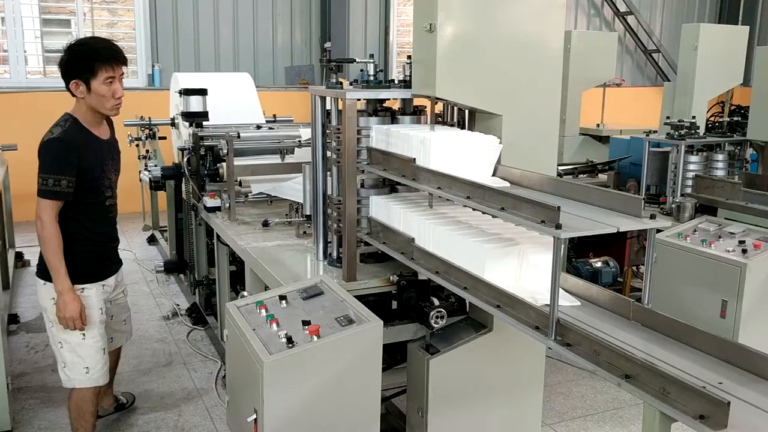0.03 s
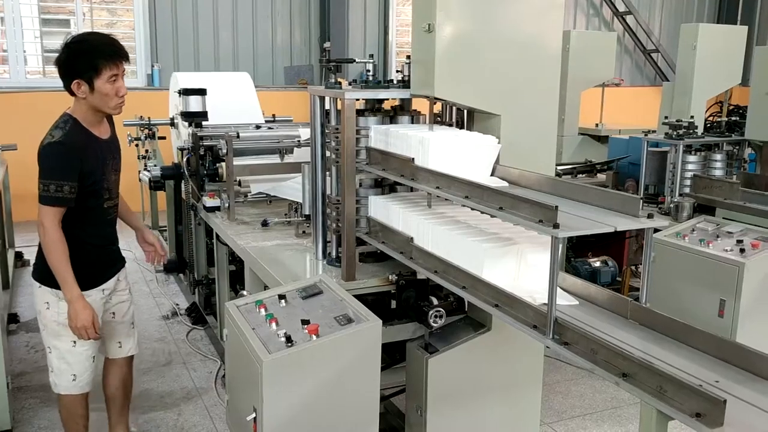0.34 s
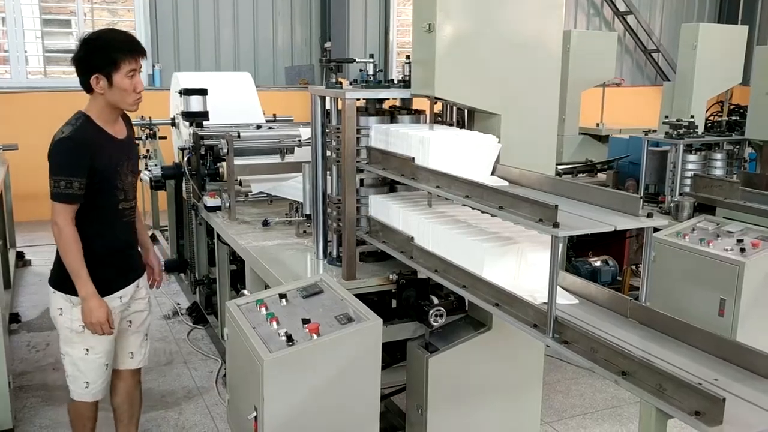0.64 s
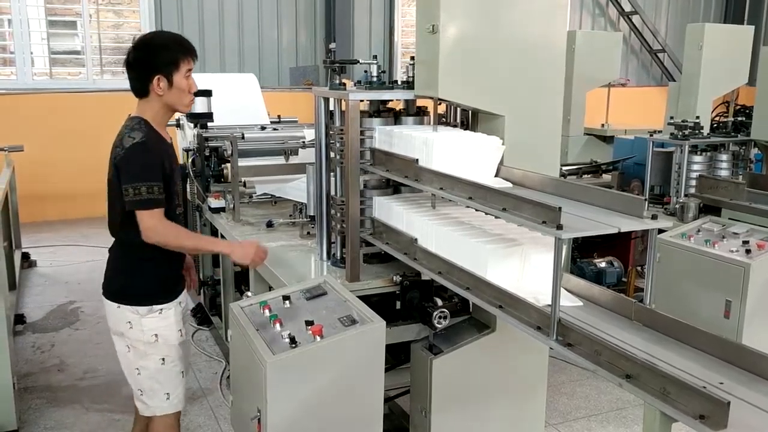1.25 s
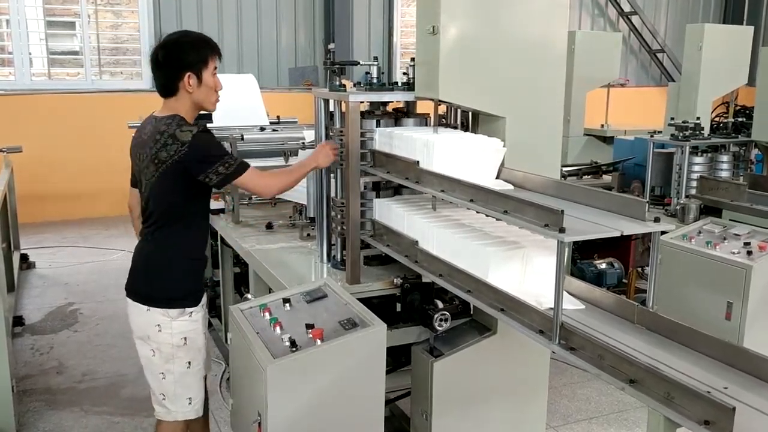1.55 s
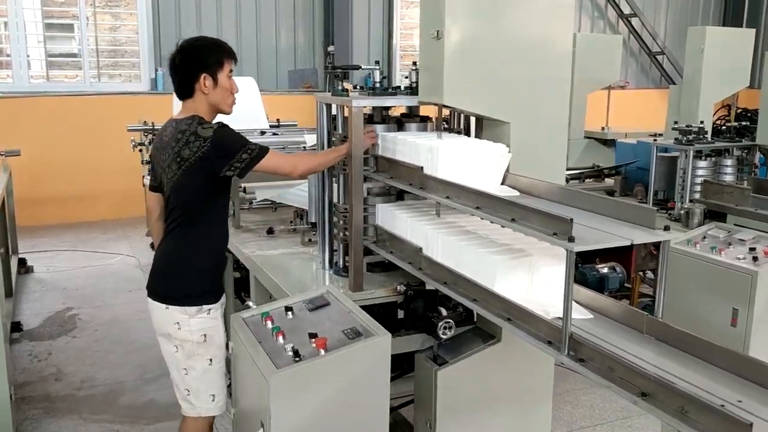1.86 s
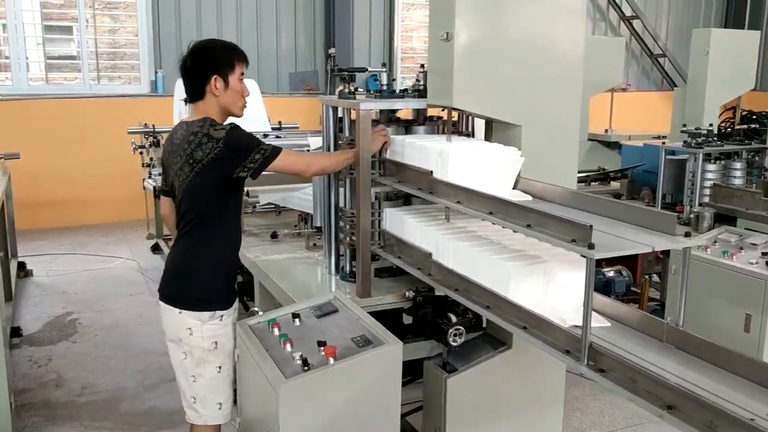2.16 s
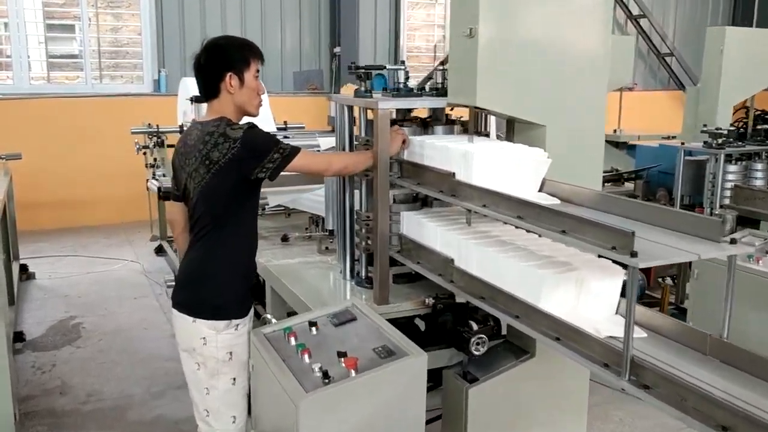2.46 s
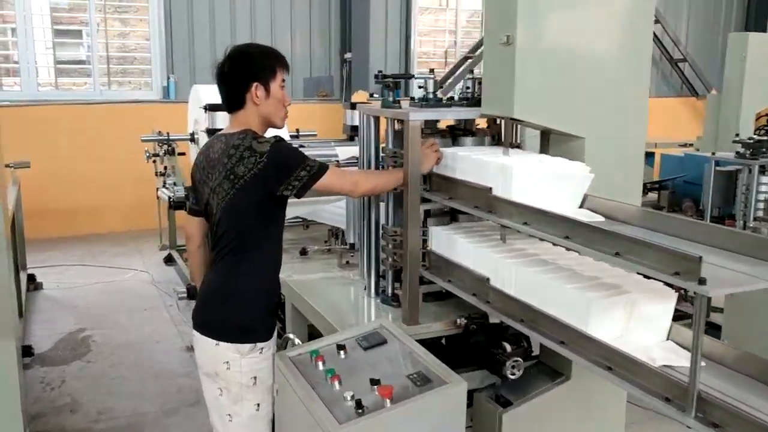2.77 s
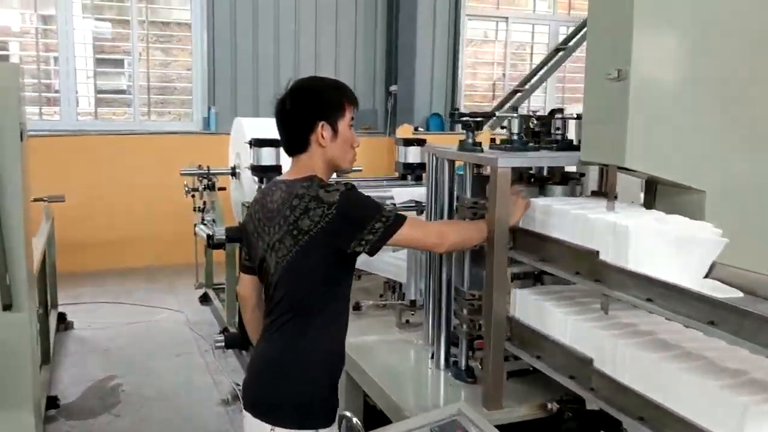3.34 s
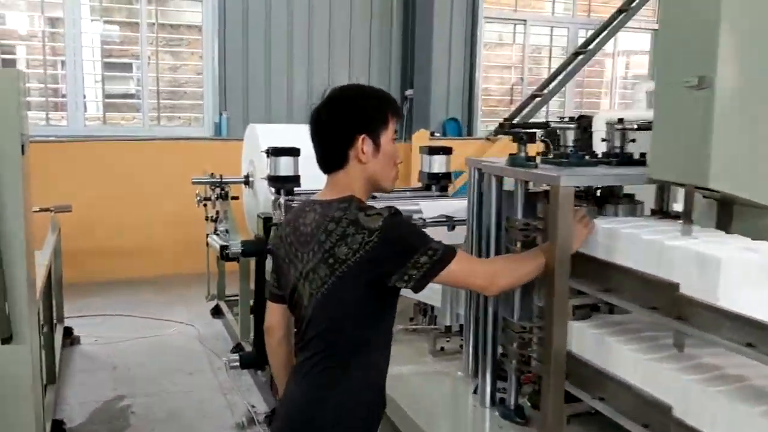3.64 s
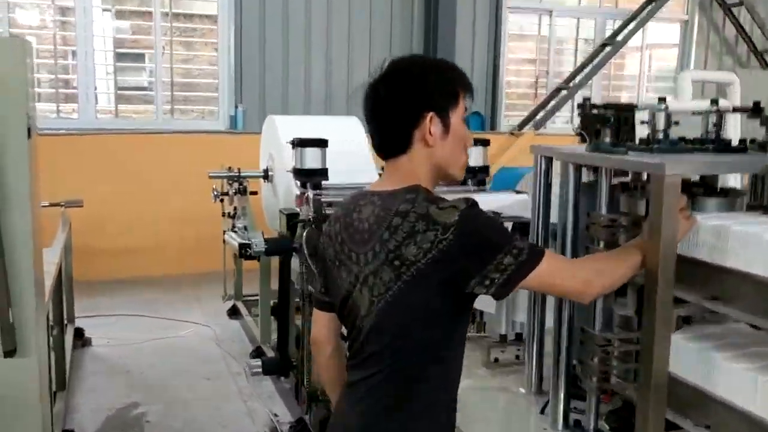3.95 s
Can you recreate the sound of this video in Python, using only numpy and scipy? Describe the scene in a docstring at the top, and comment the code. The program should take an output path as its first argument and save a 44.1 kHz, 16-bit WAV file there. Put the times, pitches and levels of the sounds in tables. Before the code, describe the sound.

Rapid, steady clatter and whirring drone of a paper folding machine, growing slightly closer.

```python
"""In a factory hall, a paper folding machine makes about 22 folds a second.
Each fold thumps, rattles the linkage (the moving rods) and swishes the paper through the rollers.
Gears and drive whine, the frame rings, and a small catch ticks and bounces after every 25 folds.
The listener walks up to the folding head, where the whines change balance and air hisses steadily."""
import sys
import numpy as np
from scipy import signal
from scipy.fft import rfft, irfft, next_fast_len
from scipy.io import wavfile
from scipy.ndimage import map_coordinates

SR = 44100
rng = np.random.default_rng(int(sys.argv[2]) if len(sys.argv) > 2 else 0)


def file_out(sig):
    """Save sig as 16-bit WAV at sys.argv[1]."""
    # one column per channel
    cols = np.atleast_2d(sig).T
    # limit, then scale
    lim = np.clip(cols, -1, 1)
    pcm = np.round(lim * 32767).astype(np.int16)
    wavfile.write(sys.argv[1], SR, pcm)


N = 176400
FOLD_HZ = 22.14  # folds a second


def amp(db):
    """Turn decibels into a gain to multiply by."""
    return 10 ** (np.asarray(db) / 20)


def unit(x):
    """Scale a sound to an average (rms) level of 1."""
    return x / np.sqrt(np.mean(x ** 2) + 1e-20)


def clock():
    """The time of every sample, in seconds."""
    return np.arange(N) / SR


def wobble(rate_hz):
    """A smooth curve through rate_hz random points a second."""
    return map_coordinates(rng.standard_normal(400), [clock() * rate_hz], mode="mirror")


def filtered(x, response):
    """Multiply each frequency in x by response(hz)."""
    size = next_fast_len(N + SR // 2)
    return irfft(rfft(x, size) * response(np.fft.rfftfreq(size, 1 / SR)), size)[:N]


def coloured(x, spectrum):
    """Shape the tone of x with rows of pitch_hz, level_db, then scale it to level 1."""
    pitch_hz, level_db = np.transpose(spectrum)
    return unit(filtered(x, lambda hz: amp(np.interp(np.log(hz + 1), np.log(pitch_hz), level_db))))


def noise(spectrum):
    """Noise with the given tone, at level 1."""
    return coloured(rng.standard_normal(N), spectrum)


def stroke(peak_s):
    """A swing that peaks once in every fold."""
    return np.cos(2 * np.pi * FOLD_HZ * (clock() - peak_s))


def rippled(x, step_hz, depth_db):
    """Many small resonances of steel and hall make some pitches louder and others softer."""
    bumps = rng.standard_normal(4000)
    return unit(filtered(x, lambda hz: amp(depth_db * map_coordinates(bumps, [hz / step_hz], mode="mirror"))))


def ringing(hz, width):
    """A resonance: noise rings in a narrow band around one pitch."""
    shaking = rng.standard_normal(N)
    return unit(filtered(shaking, lambda f: (1j * f * width / (hz * hz - f * f + 1j * f * width)) ** 2))


def throbbing(hz, width, depth, crest_s=2.63):
    """A firmly driven resonance: its pitch wanders and its level throbs once every two folds."""
    ring = signal.hilbert(ringing(hz, width))
    beat = 1 + depth * np.exp(-1j * np.pi * FOLD_HZ * (clock() - crest_s))
    evened = ring / np.sqrt(np.abs(ring) ** 2 + .5)
    return unit(np.real(beat * evened))


def air_hiss(start_s=2.46, rise_s=0.27):
    """A steady hiss of air comes into the open at the folding head."""
    # Tone of the hiss: pitch_hz, level_db
    hiss_tone = [(1200, -9), (2700, -1.5), (5300, -1), (7000, -1), (8800, 0), (9700, 0.5), (10600, -1),
                 (13000, -3), (17000, -7)]
    opening = np.clip((clock() - start_s) / rise_s, 0, 1)
    gain = amp(-31 + 0.22 * wobble(30.05)) * opening
    return gain * rippled(noise(hiss_tone), step_hz=49.2, depth_db=0.5)


def gear_whine(near):
    """The drive and gears give pure tones, each wavering in the hall."""
    # The tones, with relative levels from afar and at the head: pitch_hz, far_db, near_db
    whines = [(132.8,-45,-46), (425.3,-48.5,-47), (599.7,-47,-42.5), (958,-49,-52), (986,-58,-55),
              (1031,-44.5,-45), (1080,-50,-47), (1212,-48,-44), (1239,-44.5,-46), (1328,-49,-47),
              (1437,-50,-60), (1729,-56,-44.5), (1747,-52,-46.5), (1847,-51.5,-50), (1995,-52,-52),
              (2040,-58,-48), (2150,-48.5,-50), (3380,-64,-60), (3775,-56,-59)]
    out = np.zeros(N)
    for hz, far_db, near_db in whines:
        phase = 2 * np.pi * (hz * clock() + rng.random()) + 0.33 * wobble(9)
        level_db = far_db + (near_db - far_db) * near + 2 * wobble(6.06)
        out += amp(level_db) * np.sin(phase)
    return np.sqrt(2) * amp(0.5) * out


def frame_ring(near):
    """The rollers keep the frame ringing; its strongest resonances swell, ebb and throb."""
    # Steady resonances of the frame: pitch_hz, width_hz, far_db, near_db
    steady = [(604.2, 38, -42.5, -43.5), (1012.3, 37, -43, -43), (1114, 46, -61, -44),
              (1250, 41, -43.5, -45.5), (1734, 42, -54, -47), (2010, 93, -51, -45.5), (3470, 51, -57, -48)]
    # Swelling resonances: pitch_hz, width_hz, throb_depth (0-1), list of (time_s, level_db)
    swelling = [ (66.26, 1.5, 0.69, [(.3,-51), (.6,-44), (1.1,-62), (1.5,-41), (2,-41.5), (2.4,-46),
                (2.8,-49), (3.3,-39), (3.7,-43), (3.95,-35)]), (116.4, 26, 0.24, [(.3,-37), (.85,-52),
                (1.02,-36.5), (1.15,-48), (1.3,-35), (1.42,-43), (1.65,-39), (1.98,-46), (2.28,-35),
                (3.1,-49), (3.3,-35), (4,-41.5)]), (183.9, 9.1, 0.059, [(.5,-43), (.75,-60), (1.2,-33.5),
                (1.55,-49), (2,-48), (2.25,-32.5), (2.5,-44), (2.8,-37), (3.1,-51), (3.55,-34), (4,-45.5)]),
                (199.7, 2.14, .1, [(.3,-37), (.7,-41.5), (1,-43.5), (1.3,-40), (1.95,-35.5), (2.2,-52),
                (2.5,-39.5), (3.05,-33), (3.35,-43.5), (3.65,-44), (3.9,-44)]), (567.6, 28, 0.11, [(.4,-49),
                (3.4,-46), (3.65,-34.5), (4,-44)]), (644.5, 1.9, 0.079, [(.4,-49), (2.35,-50), (2.8,-40),
                (3.55,-36.5), (4,-40)]), (666, 21, 0.26, [(.4,-50), (1.2,-48), (1.35,-40), (1.7,-45),
                (2.4,-47), (2.49,-37), (2.8,-41), (3.35,-45), (3.62,-33.5), (3.9,-46)]),
                (720.4, 9.4, 0.42, [(1.1,-49), (1.35,-39), (1.75,-59), (2.3,-39.5), (2.78,-31.5),
                (3.05,-35.5), (3.2,-39), (3.55,-41), (4,-47)]), (1553, 16.4, 0.12, [(.4,-40), (1.45,-43),
                (1.58,-32), (1.7,-41.5), (1.93,-36.5), (2.22,-39.5), (2.35,-35.5), (3,-47), (3.17,-36.5),
                (3.4,-44), (4,-38.5)])]
    out = np.zeros(N)
    for hz, width, far_db, near_db in steady:
        out += amp(far_db + (near_db - far_db) * near) * ringing(hz, width)
    for hz, width, depth, levels in swelling:
        out += amp(np.interp(clock(), *np.transpose(levels))) * throbbing(hz, width, depth)
    return out


def counter_ticks(near, first_s=.7163, folds_per_tick=25):
    """The counter's catch (a pawl) drops and bounces twice, with a tiny click and ring each time."""
    # The hits in one tick: delay_s, relative level_db
    bounces = [(0, 0), (.009, -2.5), (.0152, -6)]
    # Ringing tones of the catch: pitch_hz, relative level_db, fade_s (time to fall 60 dB)
    tones = [(3120, -17, .035), (5080, -15.5, .025), (5330, 0, .0058), (5620, -17, .025)]
    out, t = np.zeros(N + SR), np.arange(SR // 10) / SR
    attack = 1 - np.exp(-t / .0007)
    for start_s in np.arange(first_s, N / SR, folds_per_tick / FOLD_HZ):
        for delay_s, hit_db in bounces:
            ring = sum(amp(db - 60 * t / fade_s) * np.sin(2 * np.pi * (hz * t + rng.random()))
                       for hz, db, fade_s in tones)
            click = amp(-12 - 60 * t / 0.0025) * rng.standard_normal(len(t))
            gain = amp(-14 + hit_db + 3.5 * near[int(start_s * SR)])
            out[round((start_s + delay_s) * SR):][:len(t)] += gain * (ring + click) * attack
    return out[:N]


def paper_swish(scuff_width_s=0.027):
    """The paper swishes through the rollers once a fold and now and then scuffs."""
    # Tone of the sliding paper: pitch_hz, level_db
    paper_tone = [(1500, -20), (4000, 0.5), (7000, 0.5), (8800, -1.5), (9600, 2), (10600, 0.5), (12000, 1),
                  (14500, -5.5), (17000, -10)]
    # Brief scuffs: peak_s, level_db
    scuffs = [(1.045, -39.5), (1.4, -45)]
    t = clock()
    swish_gain = amp(-40.5 + 0.8 * stroke(peak_s=0.0083) + 0.52 * wobble(41.2))
    scuff_gain = sum(amp(db) * np.exp(-((t - peak_s) / scuff_width_s) ** 2) for peak_s, db in scuffs)
    swish = rippled(noise(paper_tone), step_hz=44.7, depth_db=1.8)
    return swish_gain * swish + scuff_gain * noise(paper_tone)


def linkage_knocks(fade_s=.07):
    """Now and then the linkage gives a harder knock that dies quickly."""
    # The knocks: start_s, relative level_db
    knocks = [(1.3215, -23), (2.4055, -17.5), (2.981, -18.5), (3.5335, -16.5), (3.983, -16)]
    # Tone of a knock: pitch_hz, level_db
    knock_tone = [(200, -14), (700, 2), (2200, -1), (3100, -1), (4200, -5), (6000, -17), (16000, -28)]
    t = clock()
    gain = sum((t >= start_s) * amp(db - 60 * np.abs(t - start_s) / fade_s) for start_s, db in knocks)
    return gain * noise(knock_tone) / 2


def linkage_clatter(near, rattles_per_s=70):
    """The linkage clatters, surging with each fold, with loose rattles on top."""
    # Tone of the clatter: pitch_hz, level_db
    clatter_tone = [(100, -7), (300, -9), (400, -1.5), (520, -4), (600, -1), (700, 2), (770, 2), (860, 1),
                    (1020, -0.5), (1400, -2), (2200, -3.5), (2550, -10.5), (3200, -12.5), (3500, -8),
                    (3950, -9), (4600, -14), (6000, -23.5), (10000, -34), (17000, -38)]
    hits = rng.random(N) < rattles_per_s / SR
    strengths = amp(2.5 * np.clip(rng.standard_normal(N), -2, 2))
    decay = amp(-60 * clock()[:SR // 10] / 0.028)  # each rattle falls 60 dB in 28 ms
    rattles = unit(signal.fftconvolve(hits * strengths, decay)[:N] * rng.standard_normal(N))
    dense = rippled(rng.standard_normal(N), step_hz=14, depth_db=3.0)
    clatter = coloured(dense + amp(-12) * rattles, clatter_tone)
    level_db = -30 + 2.5 * near + 0.62 * stroke(peak_s=0.019) + .8 * np.tanh(wobble(24.82))
    return amp(level_db) * clatter


def folding_rollers(first_s=0.03248, thump_hz=148, thump_width_s=0.0033):
    """The rollers rumble and give one soft thump in each fold."""
    # Tone of the rumble: pitch_hz, level_db
    rumble_tone = [(20, -42), (33, -26), (43, -19), (54, 0.5), (76, -7), (108, -1.5), (130, 0.5), (156, -6),
                   (186, -4), (230, -1.5), (320, -6.5), (500, -15.5), (1200, -57)]
    t = ((clock() - first_s) * FOLD_HZ + .5) % 1 / FOLD_HZ - .5 / FOLD_HZ  # time from the nearest thump
    thumps = np.exp(-(t / thump_width_s) ** 2) * np.cos(2 * np.pi * thump_hz * t)
    thumps *= amp(-28.5 + 0.58 * wobble(35))
    return amp(-34.5) * noise(rumble_tone) + thumps


def scene():
    """Add up all the sounds in one channel as the listener walks closer."""
    # The walk: time_s, nearness (0 = far away, 1 = at the folding head)
    walk = [(.4, 0), (1.1, 0.14), (2.2, 0.92), (2.7, 0.97), (4, 0.93)]
    near = np.interp(clock(), *np.transpose(walk))
    hum = gear_whine(near) + frame_ring(near)
    folding = folding_rollers() + linkage_clatter(near) + paper_swish()
    return (hum + folding + air_hiss() + counter_ticks(near) + linkage_knocks())[None]


def record(dry):
    """Fade the sound in and cut the deepest bass and the highest treble."""
    low_hz, top_hz = 34, 17050
    fade = np.clip((clock() - 0.055) / 0.28, 1e-6, 1) ** 1.07
    fade *= clock() > .079  # a moment of silence first
    thinned = signal.sosfilt(signal.butter(4, low_hz, "high", fs=SR, output="sos"), dry[0])
    return filtered(thinned * fade, lambda hz: hz < top_hz)[None]


dry = scene()
out = record(dry)
file_out(out)
```